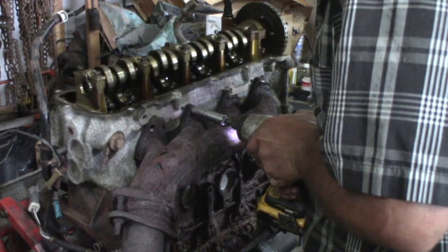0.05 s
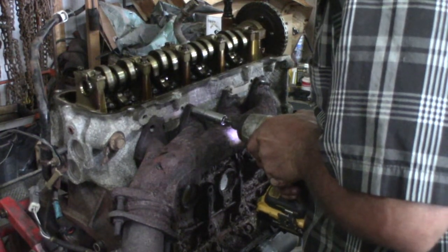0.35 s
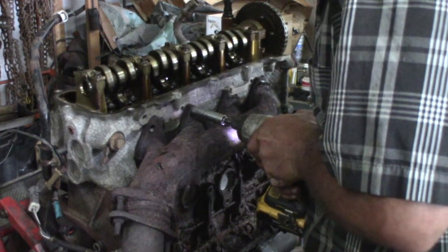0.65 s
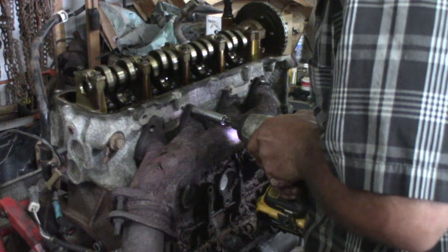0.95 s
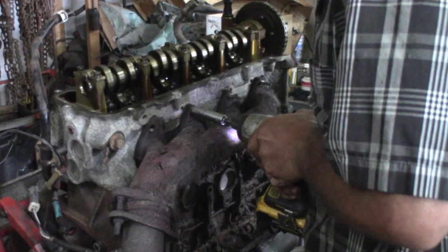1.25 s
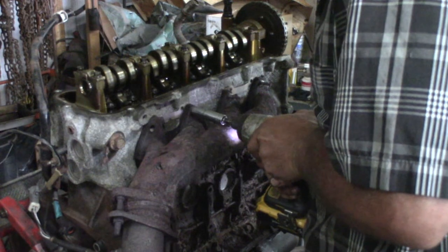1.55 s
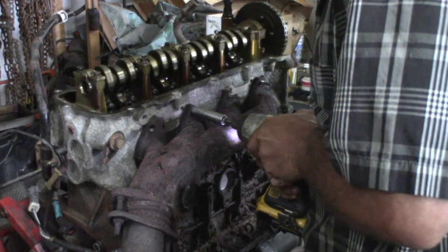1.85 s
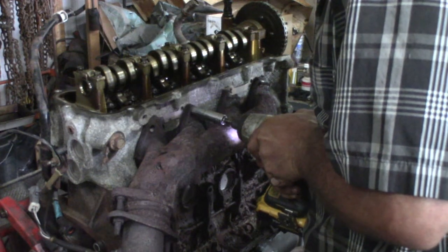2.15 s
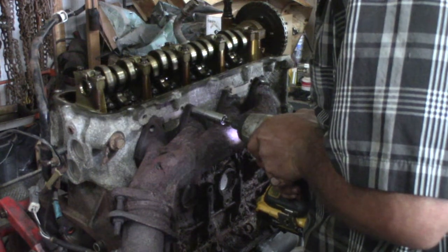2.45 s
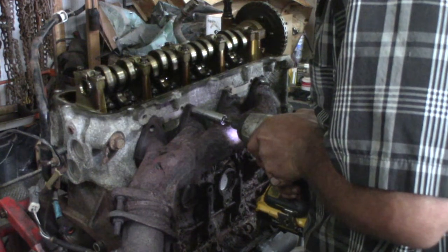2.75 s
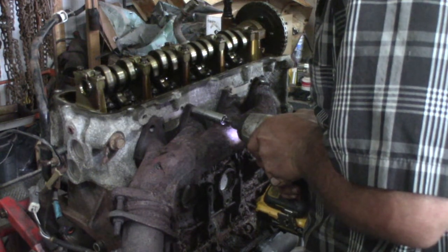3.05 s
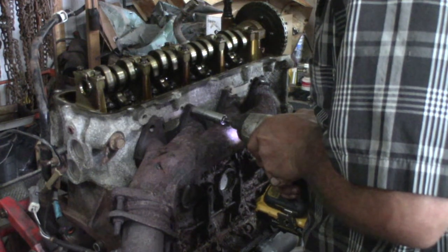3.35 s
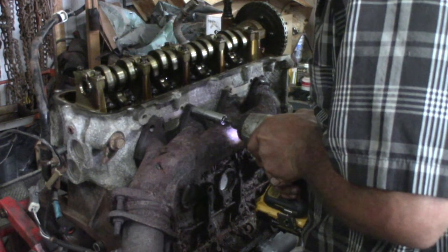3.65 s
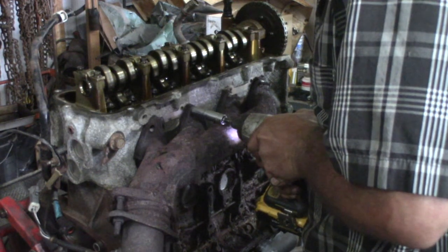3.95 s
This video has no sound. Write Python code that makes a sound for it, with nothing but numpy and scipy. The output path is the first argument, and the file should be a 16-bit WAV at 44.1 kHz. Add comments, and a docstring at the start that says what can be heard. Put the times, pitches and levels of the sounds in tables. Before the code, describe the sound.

A cordless impact wrench hammers nonstop at a stuck engine bolt, close to the microphone in a workshop. The hard, bright blows speed up and lose some of their knock halfway, over whirring gears and ringing metal.

```python
"""Hard, bright hammering, close up: a cordless impact wrench works without pause at a stuck manifold bolt.
Each blow is a dull knock, a steel strike with a second contact, and a rebound. The blows quicken from
15 to 25 a second and the knock weakens halfway. The bare engine's castings ring under the gears' whirr,
with a cluttered workshop behind. The pickup is nearly mono; a fast limiter ducks under each strike."""
import sys
import numpy as np
from scipy import signal
from scipy.fft import rfft, irfft
from scipy.io import wavfile
from scipy.ndimage import uniform_filter1d

SR = 44100
rng = np.random.default_rng(int(sys.argv[2]) if len(sys.argv) > 2 else 0)


def generate_wav(signal):
    """Clip the signal to [-1, 1] and save it as 16-bit WAV at the path in sys.argv[1]."""
    frames = np.transpose(np.atleast_2d(signal))
    scaled = np.clip(frames, -1, 1) * 32767
    pcm = np.round(scaled).astype(np.int16)
    wavfile.write(sys.argv[1], SR, pcm)


N = 176400
TIME = np.arange(N) / SR


def steel_contacts(blows):
    """Up front, each contact sets off a dense, fast-dying clash of hammer, anvil and socket."""
    # contacts within one blow: (delay after the strike [s], timing scatter [s], level [dB],
    # level scatter [dB], decay time [s], treble tilt [dB/octave])
    contacts = [(-.0042, 0.00024, -7, -5.2, 0.001, -3.5), (0, 0.00013, 3, 0.8, 0.00062, -0.87),
                (.0017, .0003, -2.5, -0.5, 0.004, 1), (0.0115, 0.00036, -7, 1.6, 0.002, 3),
                (0.0187, 0.0019, -16.5, 3, 0.0046, 6.5)]
    # colour of struck steel: (frequency [Hz], level [dB])
    steel_colour = [(40, -45), (170, -34), (330, -29), (700, -14.5), (1200, -12), (1700, -6.5),
                    (2400, -12.5), (3200, -11.5), (4150, 1.5), (4600, -1), (5200, 0), (6300, -3),
                    (7600, -11.5), (8500, -5), (9000, -8.5), (9500, -0.5), (10900, -13.5), (11500, -8),
                    (12400, -21), (13500, -10), (15700, -22.5)]
    usual_gap_s = .047
    stretch = (np.gradient(blows) / usual_gap_s) ** .3  # slower blows rebound later
    clash = 0
    for delay, scatter, db, scatter_db, decay, tilt_db in contacts:
        jitter, force = rng.standard_normal((len(blows), 2)).T
        times = blows + delay * (stretch if delay > 0 else 1) + scatter * jitter
        hits = clicks(times, from_db(db + scatter_db * force))
        envelope = signal.lfilter([1], [1, -np.exp(-1 / (decay * SR))], hits + 1e-18)
        clash += colour(envelope * rng.standard_normal(N), steel_colour, tilt_db)
    return clash


def knocks(blows, knock_db):
    """The tool's body thumps and knocks just ahead of each strike; being small, it radiates little bass."""
    # modes of the body: (frequency [Hz], level [dB], t60 [s], lead before the strike [s])
    tool_modes = [(80, -35, .014, 0.0123), (282, -18, 0.027, .0095), (365, -18, 0.015, 0.00876),
                  (714, -17, 0.022, 0.00581), (1020, -15, .012, 0.00565), (1567, -2.5, 0.0099, .0054),
                  (1870, -2, 0.0094, .0054)]
    body = 0
    for k, (hz, db, t60, lead) in enumerate(tool_modes):
        scatter_db = 1.5 * rng.standard_normal(len(blows))
        hits = clicks(blows - lead, from_db(db + knock_db + scatter_db))
        body += (-1) ** k * ring(hits, hz, t60)
    return signal.sosfilt(signal.butter(1, 230, "high", fs=SR, output="sos"), body)


def cam(blows, knock_db):
    """The cam's grinding swells and fades as it winds up the hammer for each blow."""
    # colour of the grinding: (frequency [Hz], level [dB])
    cam_colour = [(40, -39), (150, -21), (330, -7.5), (600, -3.5), (1000, -0.5), (1700, -7.5), (2600, -2),
                  (5000, -6), (12000, -19)]
    lead_s, width_s, follows_knock = .009, .0072, .76
    coarse_time = TIME[::20]
    swells = sum(from_db(follows_knock * db) * np.exp(-.5 * ((coarse_time - at + lead_s) / width_s) ** 2)
                 for at, db in zip(blows, knock_db))
    grinding = np.interp(TIME, coarse_time, swells) * rng.standard_normal(N)
    return from_db(-17) * colour(grinding, cam_colour)


def engine(blows, knock_db):
    """Under the tool, every blow rings the castings anew and the running wrench keeps shaking them."""
    # modes of the castings and socket: (frequency [Hz], level [dB], t60 [s])
    engine_modes = [(280.6, -41, 0.16), (343, -36, 0.23), (382.7, -30, 0.12), (646, -29.5, 0.23),
                    (768, -29, 0.14), (991, -23.5, 0.1), (1020.6, -23, 0.084), (1276, -22, 0.12),
                    (1540, -20.5, 0.089), (1754, -32, .11), (1874, -22, 0.087), (2006, -27, 0.078),
                    (2780, -25, 0.1), (3630, -25, 0.21), (3880, -30, 0.097), (4420, -53, 0.067),
                    (4580, -50, 0.087), (4500, -24, 0.13), (4940, -29, 0.24), (5096, -20.5, 0.14),
                    (5240, -29, 0.097), (5500, -43, 0.1), (8500, -24, 0.11), (8600, -31, 0.14),
                    (9200, -44, .05)]
    scatter_cycles, scatter_db, shake_db = .11, 2.5, -38
    castings = 0
    for k, (hz, db, t60) in enumerate(engine_modes):
        jitter, force = rng.standard_normal((len(blows), 2)).T
        weight_db = knock_db * (hz < 840)  # only the low modes follow the knock
        struck = clicks(blows + scatter_cycles / hz * jitter, from_db(weight_db + scatter_db * force))
        shaken = from_db(shake_db) * rng.standard_normal(N)
        castings += (-1) ** k * from_db(db) * ring(struck + shaken, hz, t60)
    return signal.sosfilt(signal.butter(2, 220, "high", fs=SR, output="sos"), castings)


def gears():
    """Between the blows, the gear train and the loose socket keep up a grainy whirr."""
    # colour of the whirr: (frequency [Hz], level [dB])
    whirr_colour = [(40, -50), (160, -43), (215, -13.5), (290, -17), (365, -5), (500, -12.5), (800, -6.5),
                    (1100, -1.5), (1600, 4), (2400, -0.5), (3250, -3), (3800, 1.5), (5200, 1), (6500, -0.5),
                    (7600, -4.5), (8500, 1), (9600, -5), (11300, -6), (12400, -15.5), (13600, -12),
                    (15700, -27)]
    # the whirr's midrange against its treble: (time [s], level [dB])
    mids_level = [(0, 2), (.8, 1), (1.7, 0), (2.3, 0), (3.1, 1), (4, -1.5)]
    grain_s, rough_db, split_hz = .002, 2, 1700
    knots = np.arange(0, TIME[-1] + grain_s, grain_s)
    grain = np.interp(TIME, knots, rng.standard_normal(N)[:len(knots)])
    whirr = from_db(-17.5) * colour(from_db(rough_db * grain) * rng.standard_normal(N), whirr_colour)
    mids = signal.sosfiltfilt(signal.butter(2, split_hz, fs=SR, output="sos"), whirr)
    mids_gain = from_db(np.interp(TIME, *np.transpose(mids_level)))
    return whirr + (mids_gain - 1) * mids


def workshop(x):
    """Farther back, the clutter returns a short, dense reverberation to the microphone."""
    # colour of the reverberation: (frequency [Hz], level [dB])
    room_colour = [(100, -5.5), (400, 11), (1000, 4.5), (1800, 5), (3000, 14), (4500, -5.5), (8000, 3),
                   (11000, -8.5), (15000, -3.5)]
    t60_s, delay_s = .67, .014
    t = TIME[:SR]
    tail = rng.standard_normal(SR) * np.exp(-np.log(1000) * t / t60_s) * (t > delay_s)
    reverberation = signal.fftconvolve(x, tail / np.linalg.norm(tail))[:N]
    return from_db(-10) * colour(reverberation, room_colour)


def limiter(x):
    """The recorder's gain ducks just ahead of each peak and recovers between blows."""
    threshold_db, share, ahead_s, release_db_per_s = -.5, .57, .0008, 442
    peak_db = 20 * np.log10(np.abs(x).max(axis=0) + 1e-9)
    over_db = np.maximum(peak_db - threshold_db, 0)
    ramp = release_db_per_s * TIME
    held_db = np.maximum.accumulate(over_db + ramp) - ramp
    smoothed_db = uniform_filter1d(np.interp(TIME + ahead_s, TIME, held_db), size=45)
    return x * from_db(-share * smoothed_db)


def from_db(db):
    """Decibels to gain."""
    return 10 ** (np.asarray(db) / 20)


def clicks(times, sizes):
    """One click of the given size at each time."""
    out, at = np.zeros(N), np.round(times * SR).astype(int)
    inside = (at >= 0) & (at < N)
    np.add.at(out, at[inside], sizes[inside])
    return out


def colour(x, spectrum, tilt_db=0, size=2048):
    """Causal filter of the given spectrum, tilted per octave; white noise keeps its power."""
    hz, db = np.transpose(spectrum)
    octave = np.log2(np.maximum(np.fft.rfftfreq(size, 1 / SR), 1))
    gain = from_db(np.interp(octave, np.log2(hz), db + tilt_db * np.log2(hz / hz[0])))
    cepstrum = irfft(np.log(gain))
    cepstrum[1:size // 2] *= 2  # minimum phase keeps attacks sharp
    cepstrum[size // 2 + 1:] = 0
    response = irfft(np.exp(rfft(cepstrum)))
    return signal.fftconvolve(x, response / np.linalg.norm(response))[:len(x)]


def ring(x, hz, t60):
    """One damped mode: a unit click starts a sine of height 1."""
    radius, angle = np.exp(-np.log(1000) / (t60 * SR)), 2 * np.pi * hz / SR
    return signal.lfilter([0, np.sin(angle)], [1, -2 * radius * np.cos(angle), radius ** 2], x + 1e-18)


def scene():
    """Wrench, engine and room close to the microphone, nearly mono."""
    # the hammer strikes the anvil: (time [s])
    blow_times = [0.038, 0.1035, 0.168, 0.2321, 0.2975, 0.3623, 0.427, 0.4894, 0.5544, 0.616, 0.6733, 0.731,
                  0.7878, 0.8418, 0.896, 0.9501, 1.0046, 1.0592, 1.1131, 1.1679, 1.2226, 1.2768, 1.3314,
                  1.3866, 1.4415, 1.4959, 1.5506, 1.6055, 1.66, 1.7146, 1.7658, 1.8175, 1.8626, 1.9072,
                  1.9517, 1.9957, 2.0397, 2.084, 2.129, 2.1719, 2.215, 2.2589, 2.2983, 2.3403, 2.3805,
                  2.4209, 2.4607, 2.5014, 2.5403, 2.5804, 2.622, 2.6604, 2.699, 2.739, 2.7798, 2.8209,
                  2.8605, 2.9013, 2.9438, 2.9848, 3.0268, 3.0695, 3.1137, 3.1562, 3.1994, 3.2434, 3.285,
                  3.33, 3.3732, 3.4164, 3.4557, 3.497, 3.5396, 3.5821, 3.6258, 3.6672, 3.7083, 3.7484,
                  3.7891, 3.831, 3.8711, 3.9104, 3.948, 3.988]
    # strength of the knock that leads each strike: (time [s], level [dB])
    knock_level = [(0, -2), (.6, -1), (1.2, -0.5), (1.8, -1), (1.95, -8), (2.4, -7), (3.2, -13.5),
                   (4, -7.5)]
    # colour of a very faint left-right difference: (frequency [Hz], level [dB])
    side_colour = [(60, 36), (250, 19.5), (1000, -1), (2200, -32.5), (4500, 4.5), (9000, -8), (15000, 6)]
    blows = np.ravel(blow_times)
    knock_db = np.interp(blows, *np.transpose(knock_level))
    wrench = steel_contacts(blows) + knocks(blows, knock_db) + cam(blows, knock_db)
    mid = wrench + engine(blows, knock_db) + gears() + workshop(wrench)
    side = from_db(-27) * colour(workshop(mid), side_colour)
    return np.array([mid + side, mid - side])


def record(dry):
    """The recorder limits the strikes, rounds their peaks and cuts the highest treble."""
    ceiling, cutoff_hz = .95, 15800
    held = limiter(dry)
    rounded = held / (1 + (held / ceiling) ** 6) ** (1 / 6)
    return signal.sosfilt(signal.ellip(12, .1, 80, cutoff_hz, fs=SR, output="sos"), rounded)


dry = scene()
out = record(dry)
generate_wav(out)
```